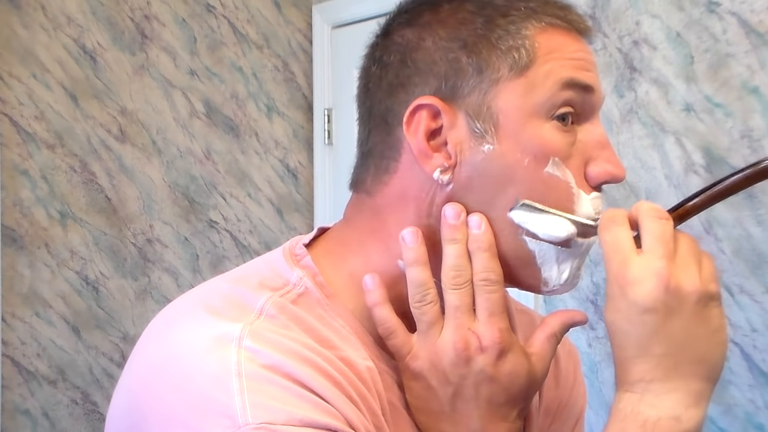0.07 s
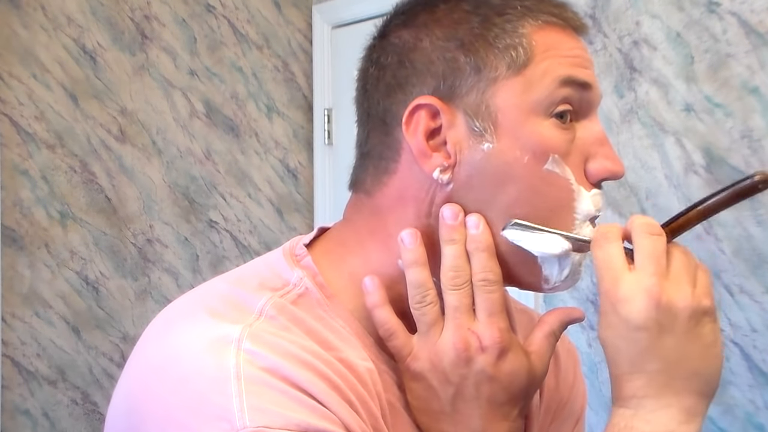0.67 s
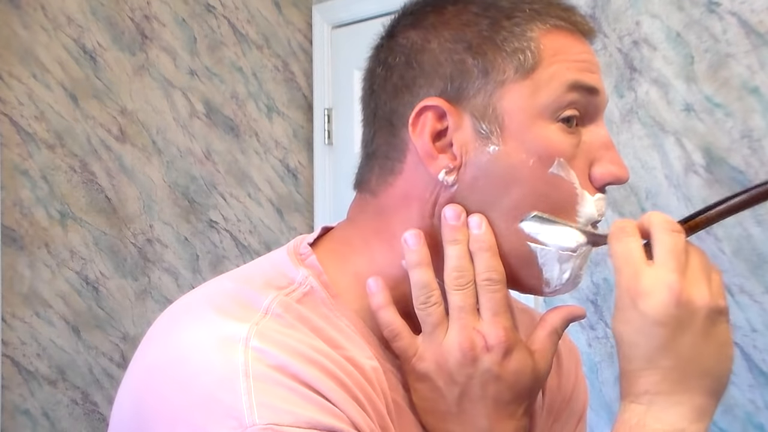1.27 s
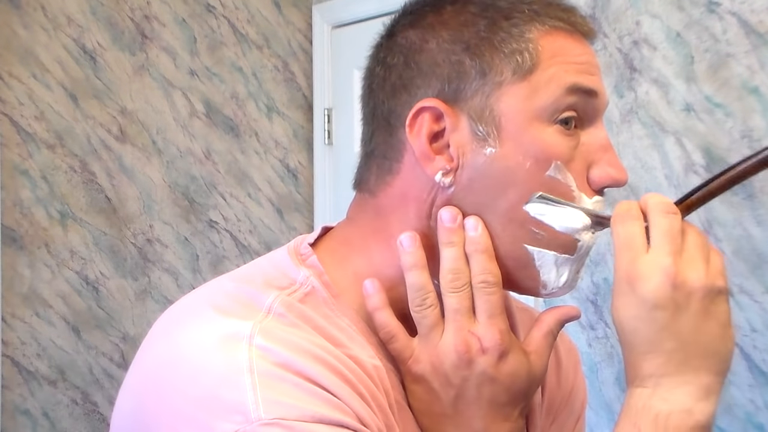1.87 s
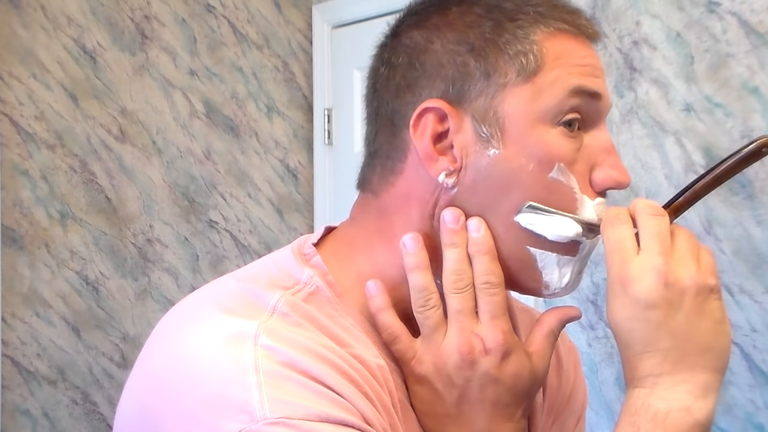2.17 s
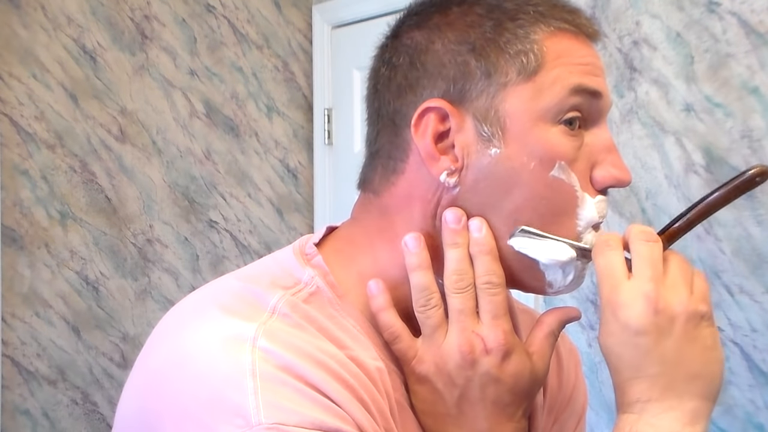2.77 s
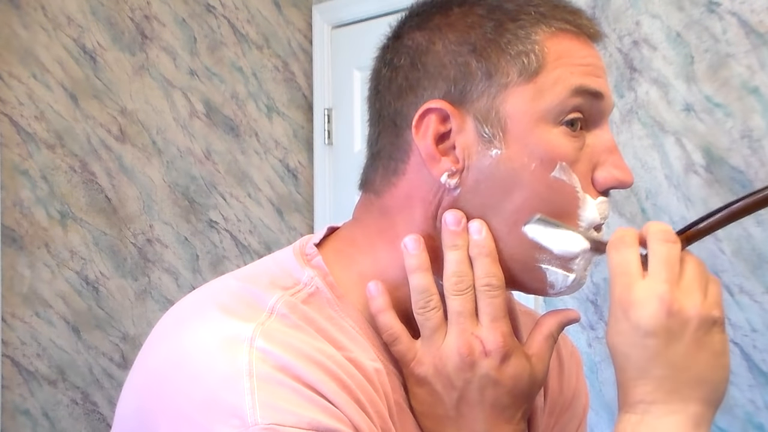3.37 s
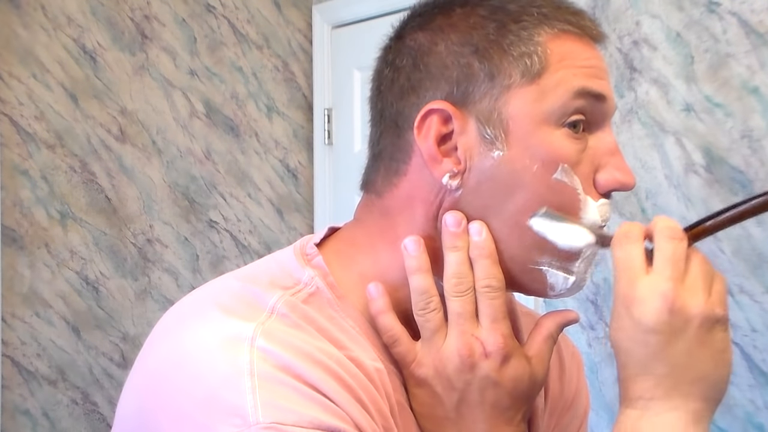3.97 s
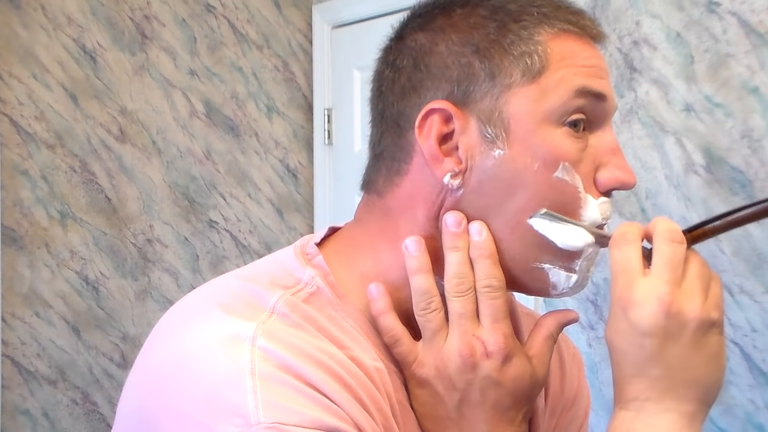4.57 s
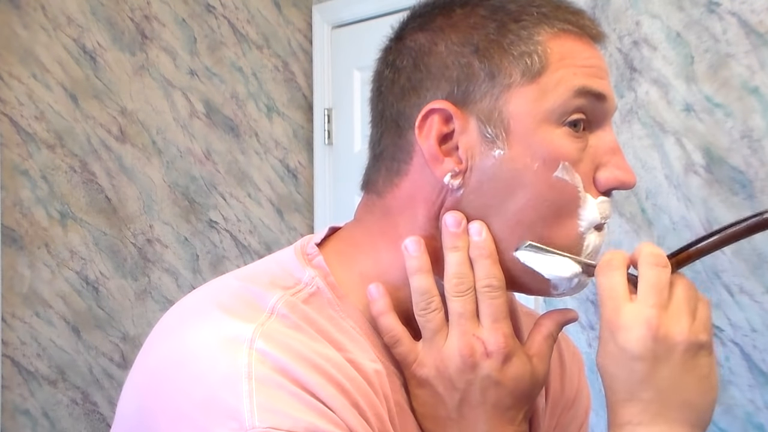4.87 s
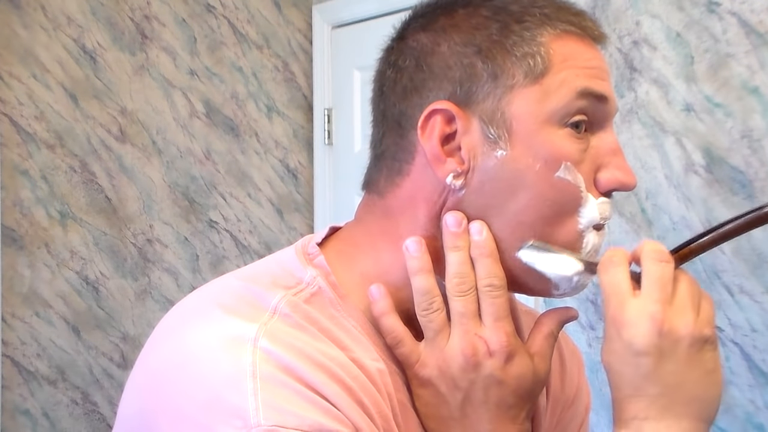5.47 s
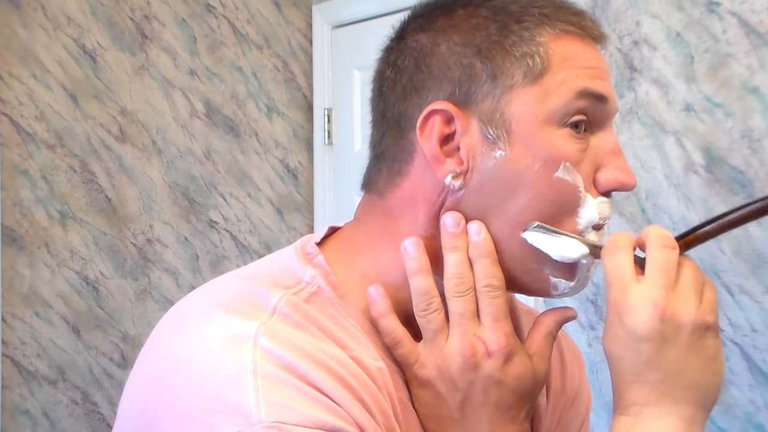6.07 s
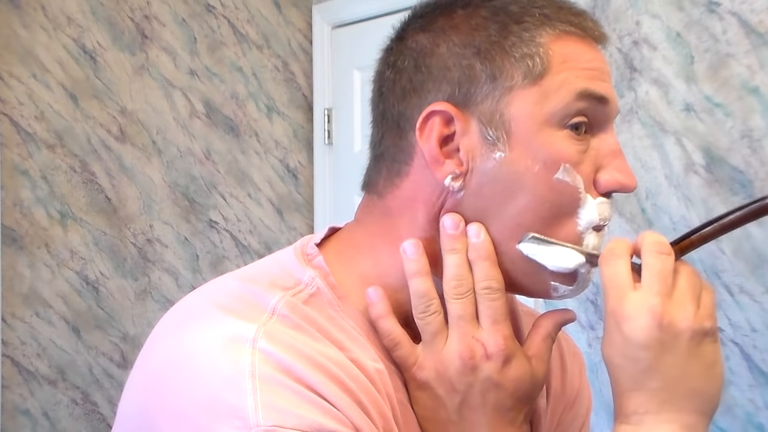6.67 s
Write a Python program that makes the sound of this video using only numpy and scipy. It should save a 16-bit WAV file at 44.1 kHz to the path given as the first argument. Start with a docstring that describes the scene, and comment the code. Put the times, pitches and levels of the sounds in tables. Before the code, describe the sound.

Close, raspy shaving strokes with tiny blade ticks, against a steady low motor hum and soft hiss.

```python
"""A stone-walled bathroom, up close: a straight razor scrapes lathered stubble in short strokes.
Each cut whisker is a tiny snap that rings the thin blade; the edge ticks where it lands or catches.
The walls ring briefly after each stroke.
A motor's mains hum and rumble and a soft hiss of air fill the pauses."""
import sys
import numpy as np
from scipy import signal
from scipy.fft import rfft, irfft, next_fast_len
from scipy.io import wavfile
from scipy.ndimage import map_coordinates

SR = 44100
rng = np.random.default_rng(int(sys.argv[2]) if len(sys.argv) > 2 else 0)


def master(y):
    """Save y as 16-bit WAV."""
    cut = np.clip(np.atleast_2d(y).T, -1, 1)
    pcm = np.round(cut * 32767)  # scale
    wavfile.write(sys.argv[1], SR, pcm.astype(np.int16))


N = 296773

# Long pulls and short nudges through the stubble: (start [s], push length [s], opening level [dB],
# end-of-push level [dB], flex send [dB], sizzle send [dB])
STROKES = [ (-0.02, 0.018, -51, -45.5, -10.5, -1), (0.197, 0.15, -49.5, -43, -12, -3),
           (0.418, 0.013, -46, -50, -12, -3), (0.641, 0.17, -48.5, -43.5, -12.5, -4),
           (1.103, 0.11, -51.5, -51, -3.5, 2.5), (1.234, 0.043, -49, -47, -5.5, 5),
           (2.29, 0.046, -55, -53, -11, -1.5), (2.37, 0.12, -63.5, -59.5, -2.5, -0.5),
           (2.57, 0.12, -54.5, -64, -9, -2.5), (2.71, 0.025, -52, -55.5, -17, -3.5),
           (2.81, 0.017, -50, -52.5, -15, 2.5), (2.878, 0.1, -52.5, -49.5, -8, -0.5),
           (3.089, 0.12, -52, -50.5, -6, 0), (3.277, 0.065, -50, -53.5, -3.5, 1),
           (3.403, 0.021, -46, -47.5, -5.5, -2), (3.697, 0.1, -60, -54.5, -9.5, -3),
           (3.825, 0.1, -48.5, -45, -10, -2.5), (4.005, 0.017, -57, -57, -11, -1),
           (4.264, 0.15, -51.5, -55.5, -12.5, -7), (4.402, 0.11, -46, -44, -9.5, -2),
           (4.582, 0.013, -45, -50.5, -3.5, -5), (4.841, 0.16, -48.5, -42.5, -7.5, -1),
           (5.078, 0.016, -46, -47, -12, -12), (5.326, 0.18, -50.5, -42.5, -7.5, -1),
           (5.607, 0.011, -51, -52, -7, -2), (5.804, 0.12, -51, -43, -6.5, -1.5),
           (5.96, 0.046, -38.5, -39, -7, 0), (6.313, 0.18, -49.5, -44, -8.5, -1.5), ]
# The blade's bending ring and its thin edge's bright ring: (pitch [Hz], width [Hz], relative level [dB])
FLEX_MODES = [(1591.5, 110, 3), (1532, 450, -9.5), (1733, 83, -3.5)]
EDGE_MODES = [(4180, 350, -11.5), (4100, 67, -6), (5370, 400, 8.5), (6270, 120, -4), (6320, 150, -3),
              (6800, 260, 4), (6710, 150, 0), (7880, 290, 0)]
# The dry body of the scrape and the fizz on top: (frequency [Hz], relative level [dB])
RASP_EQ = [(200, -8), (900, -18), (1180, -7.5), (1700, -9.5), (2150, -14), (2650, -7.5), (3150, -13.5),
           (3550, -10.5), (3950, -3), (4750, -3), (5500, -1.5), (7000, 1), (8500, -13.5), (11000, -19.5),
           (15000, -35)]
SIZZLE_EQ = [(1000, -56), (5000, -31), (7500, -10.5), (9300, 4), (11000, 1), (12500, -4), (14500, -5.5)]


def strokes():
    """Cut whiskers and sliding lather drive the blade's edge and its bending modes."""
    power = np.zeros((3, N))
    for start, push_s, first_db, last_db, flex_db, sizzle_db in STROKES:
        sends = amp([[0], [flex_db], [sizzle_db]])
        power += (sends * pressure(start, push_s, first_db, last_db)) ** 2
    cuts = whiskers(per_second=1800, spread_db=4.0, clump_hz=150.1, clump_db=2.5)
    tough_cuts = amp(-13) * whiskers(per_second=40, spread_db=1.5, clump_hz=15, clump_db=3.0)
    lather = 0.5 * rng.standard_normal(N)
    rasp_drive, flex_drive, sizzle_drive = np.sqrt(power) * unit(cuts + tough_cuts + lather)
    rasp = amp(-0.5) * through(rasp_drive, snap(RASP_EQ))
    edge = amp(-11.0) * through(rasp_drive, ring(EDGE_MODES))
    flex = amp(-1.1) * through(flex_drive, ring(FLEX_MODES))
    sizzle = amp(-0.1) * through(sizzle_drive, snap(SIZZLE_EQ))
    return rasp + edge + flex + sizzle


def pressure(start, push_s, first_db, last_db):
    """One stroke's envelope: a light touch, the bite, a push that swells or slackens, an easing off."""
    touch_s, touch_db, attack_s, release_db_per_s = 0.033, -14, 0.017, 248
    t = np.arange(N) / SR - start
    bite = np.interp(t, [-touch_s, -touch_s / 2, 0, attack_s], [0, amp(touch_db), amp(touch_db), 1])
    push_db = np.interp(t, [0, push_s], [first_db, last_db])
    ease_s = 0.3 * push_s  # longer pushes let go more gently
    fade_db = release_db_per_s * (np.hypot(np.maximum(t - push_s, 0), ease_s) - ease_s)
    return bite * amp(push_db - fade_db)


def whiskers(per_second, spread_db, clump_hz, clump_db):
    """A crackle of uneven snaps, clumping as the edge sticks and slips; rms 1."""
    cut = rng.random(N) < per_second / SR
    size_db = spread_db * np.clip(rng.standard_normal(N), -2, 2)
    grip_db = clump_db * np.tanh(wobble(clump_hz))
    return unit(cut * amp(size_db + grip_db) * rng.choice([-1, 1], N))


# The edge lands or catches a tough whisker: (time [s], relative level [dB], flex send [dB])
CATCHES = [(0.3481, -27, -22), (0.8243, -25, -38), (0.8594, -26.5, -35), (1.123, -23.5, -19),
           (1.1292, -25.5, -8.5), (1.1786, -33.5, -14), (1.2281, -25, -14), (2.3017, -36, -14),
           (2.3314, -34.5, -31), (2.4029, -35.5, -35), (2.4547, -32.5, -12.5), (2.5607, -34.5, -16),
           (2.82, -32, -9.5), (2.8814, -30.5, -20), (2.9942, -31, -32), (3.103, -31, -13),
           (3.4324, -30, -22), (4.269, -42, -24), (4.6014, -30.5, -24), (4.8536, -29, -11),
           (5.0972, -26, -18), (5.332, -32, -16), (5.816, -33.5, -15), (6.3124, -28, -13)]
# The crisp colour of the tick: (frequency [Hz], relative level [dB])
TICK_EQ = [(200, -7.5), (1000, -14), (2700, -3.5), (3400, -10.5), (4500, -5), (6700, 6.5), (10500, 1),
           (14500, -4)]


def catches(crumble_s=0.0035, crumble_gain=0.15):
    """A sharp tick, a few milliseconds of breaking hairs, and a ring of the blade."""
    ticks, kicks = np.zeros((2, N + SR))
    t = np.arange(SR // 40) / SR
    for start, db, flex_db in CATCHES:
        at = round(start * SR)
        crumble = crumble_gain * rng.standard_normal(len(t)) * np.exp(-t / crumble_s)
        burst = (t == 0) + crumble
        ticks[at:at + len(t)] += amp(db) * burst / np.linalg.norm(burst)
        kicks[at] += amp(db + flex_db)
    return amp(12) * through(ticks, snap(TICK_EQ)) + amp(18) * through(kicks, ring(FLEX_MODES))


def razor():
    """The close blade and its reflections in stereo, the top end leaning right."""
    # Direct sound sent to the side, in phase and a quarter cycle ahead: (frequency [Hz], gain [ratio])
    lean = [(4000, -0.02), (5000, 0.19), (5600, -0.091), (6300, -0.15), (7000, 0.075),
            (7800, -0.92), (14000, -0.88)]
    lead = [(4400, 0.062), (5300, 0.13), (7000, 0.54), (9000, 0.57), (14000, -0.1)]
    blade = strokes() + catches()
    direct = amp(-5.0) * blade
    wet_mid, wet_side = bathroom(blade)
    mid = wet_mid + direct
    side = wet_side + filtered(direct, lambda hz: along(lean, hz) + 1j * along(lead, hz))
    return np.array([mid + side, mid - side])


# Stereo width of the reverb: (frequency [Hz], side level re mid [dB])
REVERB_WIDTH = [(200, -1), (700, -8), (1400, -7), (2300, -23), (4000, -17), (4700, 0), (8000, 1.5),
                (14000, 2.5)]


def bathroom(x, block=3000):
    """Mid and side reverb; the reflections keep changing as the hand and blade move."""
    wet = np.zeros((2, N + SR))
    for start in range(0, N, block):
        response = reflections(early_db=-6.5, tail_db=-8.5, early_s=0.0038)
        echoes = signal.fftconvolve(x[None, start:start + block], response, axes=1)
        wet[:, start:start + echoes.shape[1]] += echoes
    mid, side = wet[:, :N]
    return mid, filtered(side, lambda hz: amp(along(REVERB_WIDTH, hz)))


# The short ring of the stone walls: (frequency [Hz], time to fall 60 dB [s])
WALL_DECAY = [(200, 0.22), (1600, 0.34), (5500, 0.37), (9000, 0.25), (14000, 0.25)]


def reflections(early_db, tail_db, early_s, scatter_hz=2800):
    """Hand and face scatter the treble within milliseconds, then the walls ring on; mid and side."""
    hz, frame_s, bands = signal.stft(rng.standard_normal((2, SR // 3)), SR, nperseg=256)
    decay = amp(-60 * frame_s / along(WALL_DECAY, hz)[:, None])
    tail = signal.istft(bands * decay, SR, nperseg=256)[1]
    t = np.arange(tail.shape[1]) / SR
    taps = rng.standard_normal(tail.shape) * (rng.random(tail.shape) < 0.15)
    low_cut = signal.butter(2, scatter_hz, "high", fs=SR)  # long waves pass round small things
    early = signal.lfilter(*low_cut, taps * np.exp(-t / early_s))
    return sum(amp(db) * layer / np.linalg.norm(layer, axis=1, keepdims=True)
               for db, layer in [(early_db, early), (tail_db, tail)])


# The motor's drone: (pitch [Hz], level before panning [dB])
HUM_TONES = [(29.8, -63.5), (60, -51), (179.9, -67), (299.9, -75)]
# The low bed under it: (frequency [Hz], relative level [dB])
RUMBLE_EQ = [(15, -8), (24, 0), (30, -1), (40, -7), (70, -8.5), (110, -13.5), (170, -17.5), (260, -17),
             (380, -30), (600, -36), (1500, -68)]


def motor():
    """A mains-driven motor hums and rumbles a little to the right, its tones wavering slightly."""
    t = np.arange(N) / SR
    hum = np.zeros(N)
    for hz, db in HUM_TONES:
        gain = np.sqrt(2) * amp(db + 0.51 * wobble(2.82))
        phase = 2 * np.pi * (hz * t + rng.random()) + 0.029 * wobble(2.5)
        hum += gain * np.sin(phase)
    rumble = amp(-59.5) * noise(RUMBLE_EQ, side_db=-2.5)
    pan = amp([[-1.3], [1.1]])
    return (hum + rumble) * pan


# Soft room tone: (frequency [Hz], relative level [dB])
AIR_EQ = [(210, -26), (350, -5.5), (515, -7), (925, -10), (1560, -13.5), (1970, -13), (3490, -14),
          (4140, -15), (14000, -18)]


def air():
    """A wide, even hiss behind everything."""
    return amp(-62.5) * noise(AIR_EQ, side_db=-0.5)


def noise(spectrum, side_db):
    """Steady stereo noise with a mid of rms 1."""
    white = rng.standard_normal((2, N))
    mid, side = unit(filtered(white, lambda hz: amp(along(spectrum, hz))))
    return np.array([mid + amp(side_db) * side, mid - amp(side_db) * side])


def snap(spectrum, size=2048):
    """The tightest click with this spectrum (minimum phase)."""
    gain = amp(along(spectrum, np.fft.rfftfreq(size, 1 / SR)))
    cepstrum = irfft(np.log(gain))
    return irfft(np.exp(rfft(2 * cepstrum[:size // 2], size)))


def ring(modes):
    """Damped modes struck once, in alternating polarity; wider ones die sooner."""
    t = np.arange(SR // 10) / SR
    return sum((-1) ** k * amp(db) * width * np.exp(-np.pi * width * t) * np.cos(2 * np.pi * hz * t)
               for k, (hz, width, db) in enumerate(modes))


def through(x, response):
    """x played through an impulse response scaled to energy 1."""
    return signal.fftconvolve(x, response / np.linalg.norm(response))[:N]


def filtered(x, response):
    """x equalised by a gain that is a function of frequency."""
    size = next_fast_len(x.shape[-1] + SR // 4)
    gain = response(np.fft.rfftfreq(size, 1 / SR))
    return irfft(rfft(x, size) * gain, size)[..., :x.shape[-1]]


def wobble(rate):
    """A smooth random curve, rate knots a second."""
    knots = rng.standard_normal(int(N * rate / SR) + 4)
    return map_coordinates(knots, [np.arange(N) * rate / SR])


def along(points, hz):
    """A curve through (frequency [Hz], value) points, read at hz on a log axis."""
    point_hz, values = np.transpose(points)
    return np.interp(np.log(hz + 1), np.log(point_hz + 1), values)


def amp(db):
    """Decibels to gain."""
    return 10 ** (np.asarray(db) / 20)


def unit(x):
    """Scaled to rms 1."""
    return x / np.sqrt(np.mean(x ** 2) + 1e-20)


def scene():
    """The razor up front, the motor and air behind."""
    return razor() + motor() + air()


def record(dry, top_hz=14300):
    """A brick-wall high cut on the whole mix."""
    return filtered(dry, lambda hz: hz < top_hz)


dry = scene()
out = record(dry)
master(out)
```